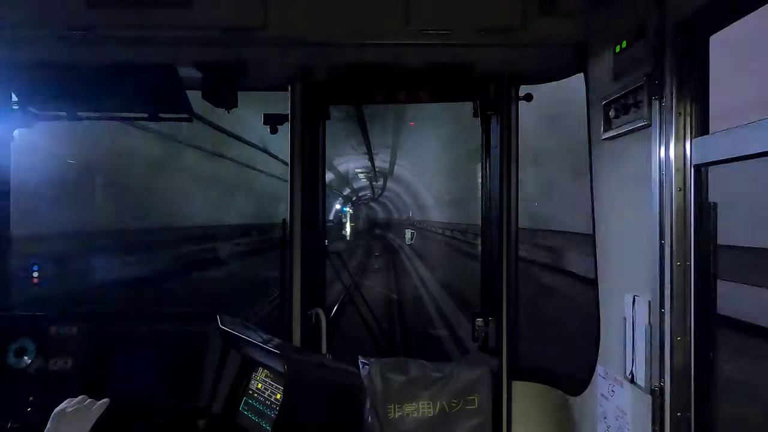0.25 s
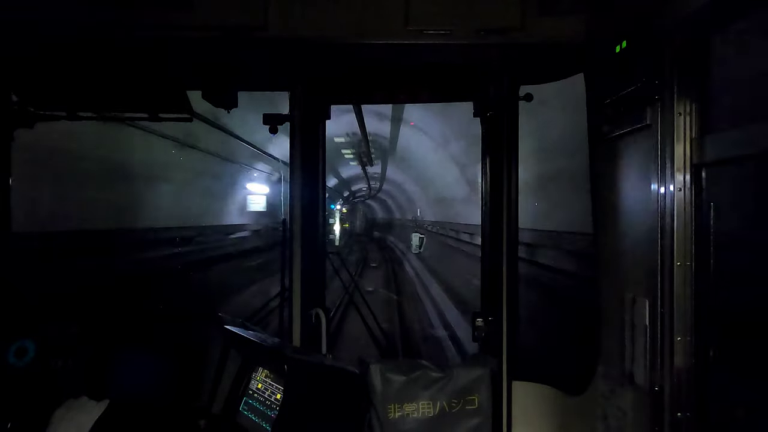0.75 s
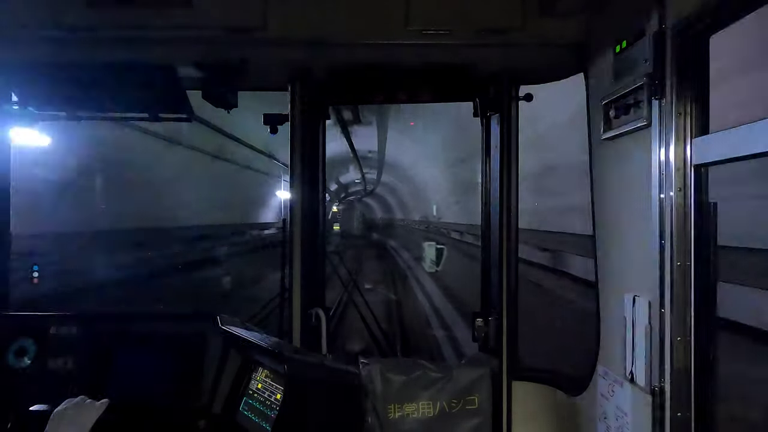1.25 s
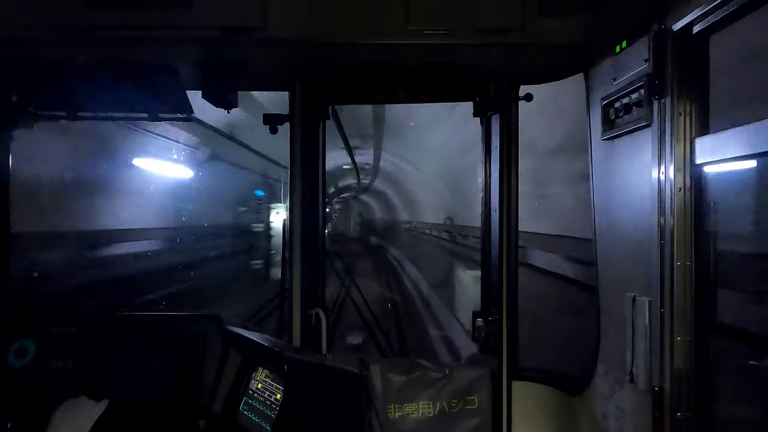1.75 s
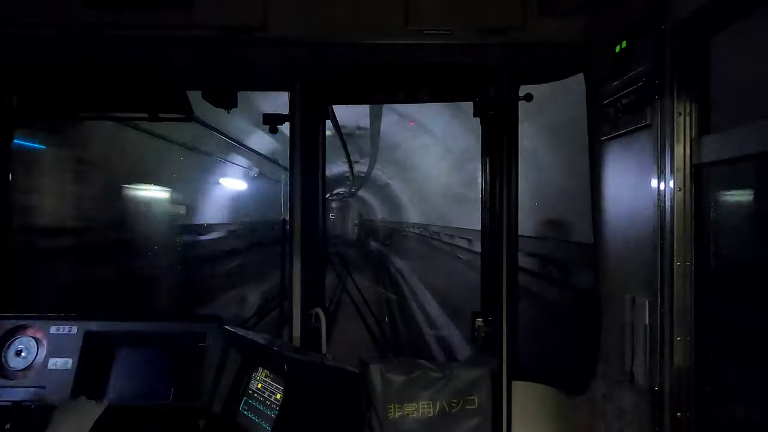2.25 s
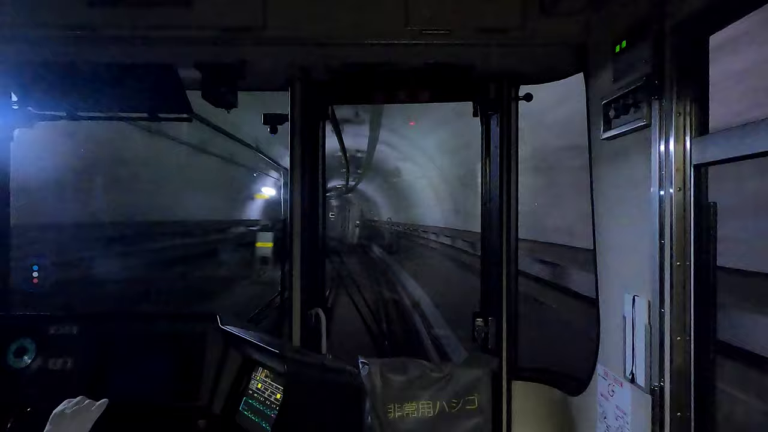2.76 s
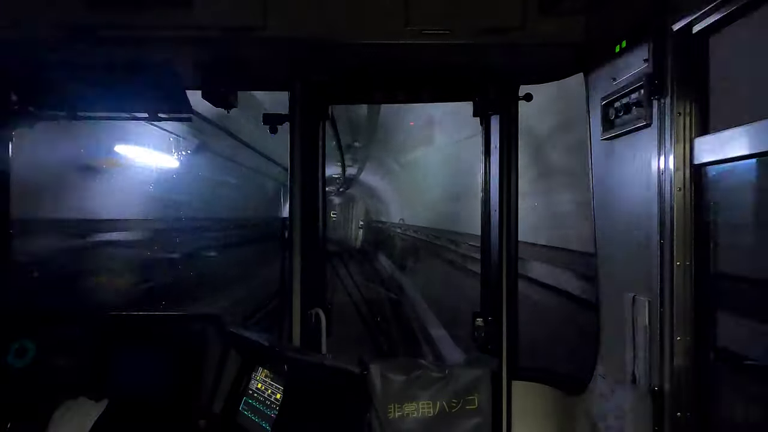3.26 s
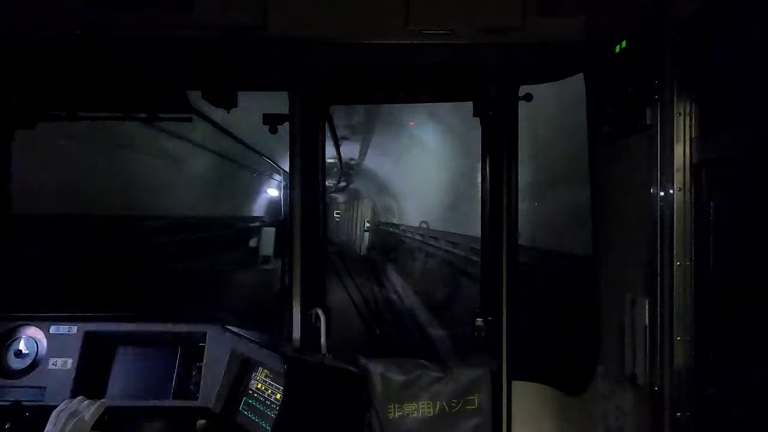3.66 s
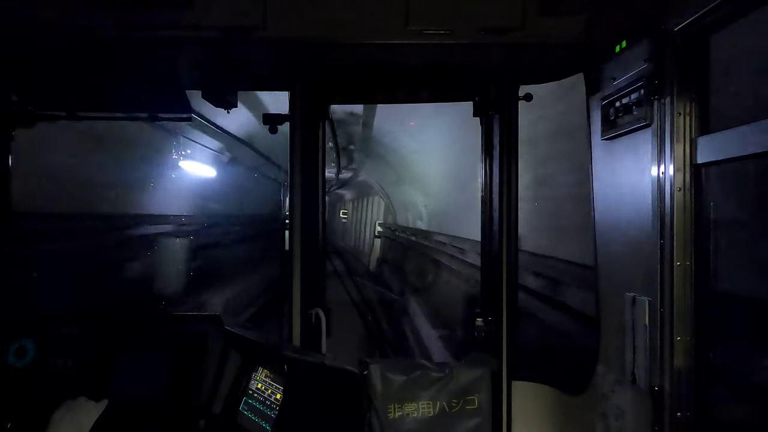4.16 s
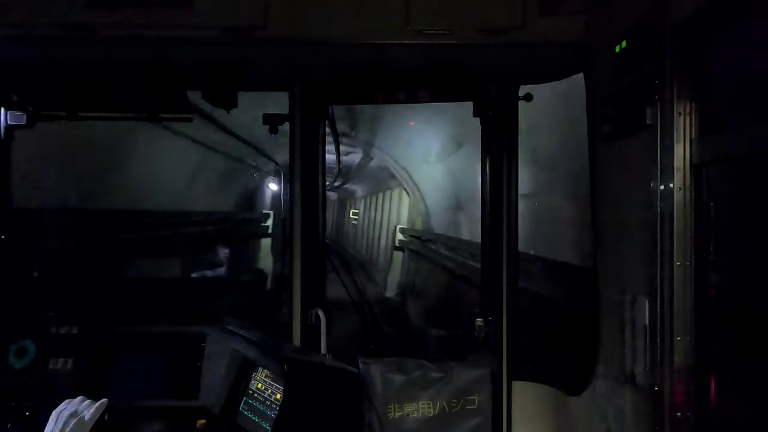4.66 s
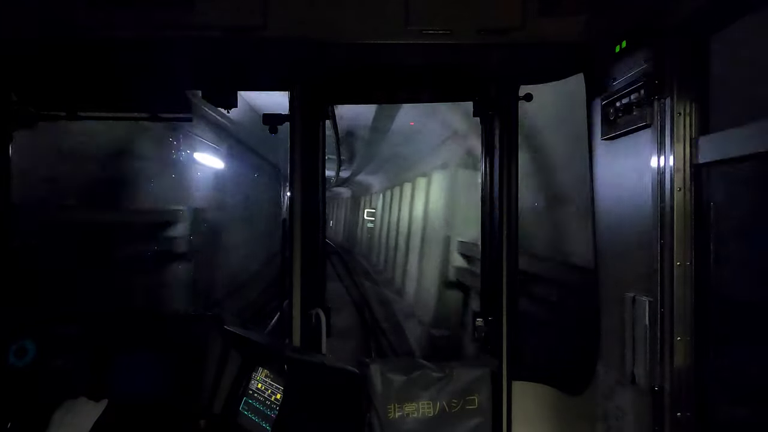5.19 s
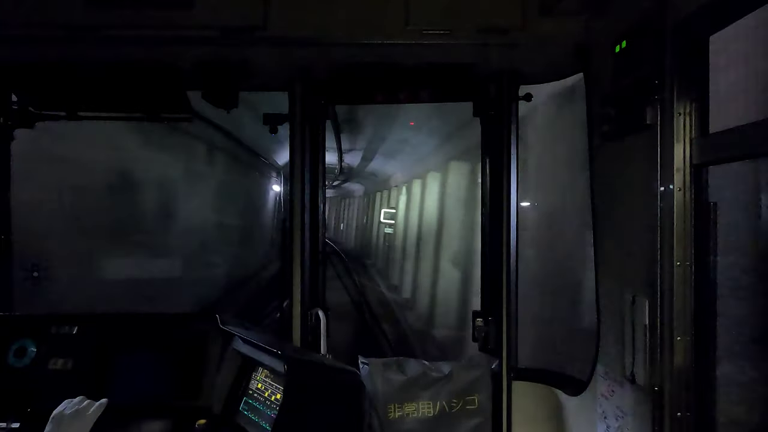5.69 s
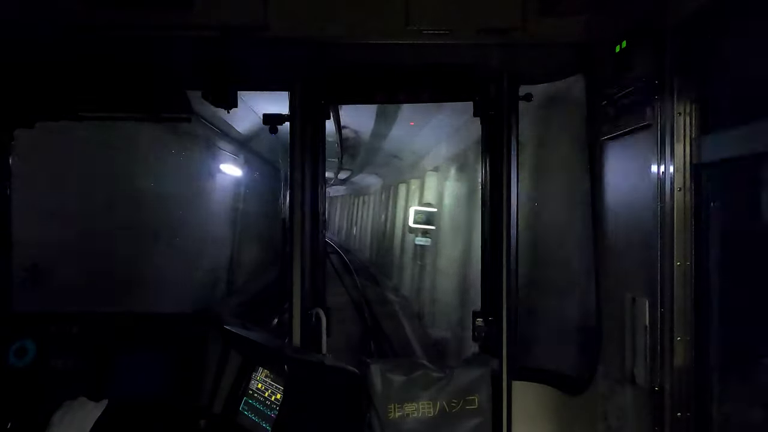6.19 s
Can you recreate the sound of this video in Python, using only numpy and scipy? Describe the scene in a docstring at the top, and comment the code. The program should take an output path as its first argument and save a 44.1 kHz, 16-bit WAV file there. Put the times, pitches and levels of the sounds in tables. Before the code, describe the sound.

Inside a driving cab, an electric train roars through a tunnel with deep wavering boom, wheel rumble and a droning rail hum that swells late.

```python
"""A low boom, rumble and roar fill the driving cab of an electric train running through a tunnel.
The boom is a wavering tone in narrow noise; rumble, roar and rushing air are shaped noise.
Worn rail drones as a hum with overtones, which swell late in the ride.
The cab lifts and cancels bands, and a close pair of microphones hears the result in stereo."""
import sys
import numpy as np
from scipy import signal
from scipy.fft import rfft, irfft, next_fast_len
from scipy.io import wavfile
from scipy.ndimage import uniform_filter1d

SR = 44100
rng = np.random.default_rng(int(sys.argv[2]) if len(sys.argv) > 2 else 0)


def unload_audio(sound):
    """Save the sound as a 16-bit wav file, at the path given as the first command line argument."""
    columns = np.transpose(np.atleast_2d(sound))
    # keep every value between -1 and 1, then stretch to whole-number steps
    steps = np.round(np.clip(columns, -1, 1) * 32767)
    wavfile.write(sys.argv[1], SR, steps.astype(np.int16))


N = 283563
MARGIN = 4096   # spare samples at each end, so filters are already running


def from_db(db):
    """Turn dB into a gain that multiplies the wave."""
    return 10 ** (np.asarray(db) / 20)


def rms_one(x):
    """Scale a sound to an rms (average strength) of 1."""
    return x / np.sqrt(np.mean(x ** 2) + 1e-20)


def in_time(rows):
    """Join the points of a time table by straight lines: one value per sample for each column."""
    s, *columns = np.transpose(rows)
    return [np.interp(np.arange(N) / SR, s, c) for c in columns]


def padded_size():
    """A length that is quick to transform and has room for both margins."""
    return next_fast_len(N + 2 * MARGIN)


def grid():
    """Frequencies of the transform bins in Hz, at least 1 so that a log is possible."""
    return np.maximum(np.fft.rfftfreq(padded_size(), 1 / SR), 1)


def at_hz(points):
    """Join the points of a frequency table, straight on a log frequency axis."""
    hz, *columns = np.transpose(points)
    return [np.interp(np.log(grid()), np.log(hz), c) for c in columns]


def drift(rate_hz):
    """Slow random wandering of rms 1: noise at every 40th sample, smoothed by two equal low-passes."""
    r = np.exp(-2 * np.pi * rate_hz * 40 / SR)
    raw = rng.standard_normal(N // 40 + 2002)
    slow = signal.lfilter([1], [1, -2 * r, r * r], raw)[2000:]   # drop the filter's start
    return np.interp(np.arange(N) / 40, np.arange(len(slow)), rms_one(slow))


def noise(gain):
    """Two unrelated noises of one colour: what both microphones share, and the diffuse rest."""
    size = padded_size()
    white = rng.standard_normal((2, size))
    return rms_one(irfft(rfft(white) * gain, size)[:, :N])


def coloured(spectrum):
    """Noise shaped by a spectrum table; only the shape counts, as its rms becomes 1."""
    return noise(from_db(at_hz(spectrum)[0]))


def band(hz, width_hz):
    """Narrow noise around a pitch that may move: two slow noises ride on a cosine and a sine."""
    phase = 2 * np.pi * np.cumsum(hz * np.ones(N)) / SR
    slow = 1 / (1 + (2 * grid() / width_hz) ** 3.0)
    return noise(slow) * np.cos(phase) + noise(slow) * np.sin(phase)


def hum(hz, width_hz, share, waver_hz):
    """A driven resonance: a wavering tone within narrow noise; share is the tone's part of the power."""
    phase = 2 * np.pi * np.cumsum(hz + waver_hz * drift(5.14)) / SR
    share = np.clip(share, 0, 1)
    tone = np.sqrt(2 * share) * np.sin(phase)
    return tone + np.sqrt(1 - share) * band(hz, width_hz)


def gusty(x, depth_db):
    """The level flutters a little, as turbulent air and uneven rail make it."""
    return x * from_db(depth_db * drift(13))   # flutter rate in Hz


def evened(x):
    """Flattens the noise's own slow swells, so that the level table sets the loudness."""
    span = max(int(0.12 * SR), 64)   # averages over 0.12 s, twice
    power = uniform_filter1d(uniform_filter1d(x ** 2, span, axis=1), span, axis=1)
    return rms_one(x / np.sqrt(power + 0.092))   # the added floor limits the lift of quiet spots


def swells(rows):
    """Bell-shaped level changes in dB at given times."""
    t = np.arange(N) / SR
    return sum(lift_db * np.exp(-((t - s) / width_s) ** 2) for s, lift_db, width_s in rows)


# the car body's boom swells and sags: (t/s, level/dB, f/Hz)
BODY_BOOM = [(0, -23, 39.9), (.45, -24.5, 39.95), (.85, -17.5, 39.7), (1.1, -28.5, 38.14),
             (1.48, -18, 36.03), (1.65, -22.5, 36.9), (1.9, -21, 38.32), (2.45, -21.5, 37.54),
             (2.94, -28.5, 35.26), (3.06, -19.5, 35.3), (3.42, -28.5, 38.3), (3.7, -17.5, 39.3),
             (4.3, -22.5, 40.73), (4.57, -31.5, 41.7), (4.75, -21, 41.43), (5.3, -25.5, 36.83),
             (5.6, -16, 33.86), (5.8, -21, 34), (6.43, -21.5, 36)]


def body_boom():
    """The car body resonates at a low, moving pitch; most of its power is a steady tone."""
    level_db, hz = in_time(BODY_BOOM)
    return from_db(level_db) * evened(hum(hz, width_hz=24, share=0.62, waver_hz=2.37))


# colour of the bogie rumble: (f/Hz, relative level/dB)
RUMBLE_COLOUR = [(8, -42), (25, 0.5), (50, 12.5), (90, 16), (130, 10.5), (170, 9.5), (260, -29.5),
                 (600, -94.5)]
# the bogie rumble thins on the worn rail: (t/s, level/dB)
RUMBLE_LEVEL = [(0, -23.5), (1.9, -22.5), (3.1, -24.5), (3.7, -24.5), (4.4, -23), (5.3, -28.5), (6.1, -25),
                (6.43, -25)]


def bogie_rumble():
    """The wheel frames rumble as low, evened noise."""
    level_db, = in_time(RUMBLE_LEVEL)
    return from_db(level_db) * evened(coloured(RUMBLE_COLOUR))


# colour of wheel and rail roar: (f/Hz, relative level/dB)
ROAR_COLOUR = [(60, -59), (150, -18.5), (270, -1), (330, -1), (500, -2.5), (700, -1), (1000, -6.5),
               (1200, -10.5), (1600, -17), (2400, -72.5), (5000, -100)]


def wheel_roar():
    """Wheel and rail roar through the floor as evened mid-range noise that fades very slightly."""
    start_db, slope_db_per_s = -19, -0.1
    level_db = start_db + slope_db_per_s * np.arange(N) / SR
    return from_db(level_db) * evened(coloured(ROAR_COLOUR))


# worn rail under the wheels: (t/s, drone level/dB, drone f/Hz, overtone level/dB, overtone f/Hz)
RAIL_DRONE = [(0, -25, 214.8, -27.5, 430.8), (1.0, -24, 215.4, -26.5, 432.1), (2.4, -25, 216, -33.5, 430.5),
              (2.8, -24.5, 220.2, -31, 434.3), (3.0, -27.5, 220, -32.5, 430.1),
              (3.3, -22, 222.8, -27.5, 430), (3.8, -25.5, 225, -32.5, 431.6), (4.3, -21.5, 226, -25, 428),
              (4.68, -20.5, 217, -26.5, 433), (4.85, -19, 219.4, -26.5, 436),
              (5.08, -23.5, 220.2, -22.5, 450), (5.25, -19, 222, -27, 445),
              (5.46, -14.5, 211.2, -30, 436.6), (5.6, -23, 205.8, -29.5, 430), (5.75, -17, 208.3, -24, 436),
              (5.88, -18.5, 231.1, -24, 436), (5.99, -20.5, 197.8, -27, 432.3),
              (6.1, -20.5, 213.1, -26, 432), (6.27, -22, 210.6, -22.5, 428.7),
              (6.43, -27.5, 212.1, -24.5, 427.6)]


def rail_drone():
    """Worn rail drives a drone and an overtone; the louder each is, the more of it is a firm hum."""
    drone_db, drone_hz, overtone_db, overtone_hz = in_time(RAIL_DRONE)
    smooth_rail_db, overtone_quiet_db = -23.5, -28   # at or below these, narrow noise only
    drone_firm = 0.07 * (drone_db - smooth_rail_db)   # share of tone, gained per dB
    overtone_firm = 0.1 * (overtone_db - overtone_quiet_db)
    drone = evened(hum(drone_hz, 76.6, drone_firm, waver_hz=5.1))
    overtone = evened(hum(overtone_hz, 58, overtone_firm, waver_hz=6.0))
    return from_db(drone_db) * drone + from_db(overtone_db) * overtone


# second body mode: (t/s, level/dB, f/Hz)
SECOND_MODE = [(0, -32.5, 60.5), (.5, -33.5, 65.2), (1.0, -26.5, 58.5), (1.3, -32.5, 60.4),
               (1.7, -26, 63.12), (2.5, -29, 63.67), (2.9, -25.5, 64.1), (3.2, -24.5, 76.5),
               (3.6, -29, 59.95), (4.5, -34.5, 62), (5.4, -31.5, 55.2), (6.43, -35, 55.1)]


def second_body_mode():
    """The car body also resonates a little higher, as narrow noise of moving pitch."""
    level_db, hz = in_time(SECOND_MODE)
    return from_db(level_db) * evened(band(hz, width_hz=24))


# ring of a floor panel: (t/s, level/dB)
PANEL_LEVEL = [(0, -30), (.8, -29), (1.4, -27.5), (2.1, -34), (2.7, -30), (3.3, -34.5), (4.2, -31.5),
               (5.0, -44), (5.6, -27.5), (6.43, -40)]


def floor_panel():
    """A floor panel rings as narrow noise at one fixed pitch."""
    level_db, = in_time(PANEL_LEVEL)
    return from_db(level_db) * evened(band(328.4, width_hz=39))


# colour of the air rush: (f/Hz, relative level/dB)
RUSH_COLOUR = [(400, -64), (1000, -23), (1500, -2.5), (2000, -3.5), (2500, -11), (3000, -19.5),
               (4500, -63.5), (10000, -110)]
# echo off the tunnel wall: (t/s, rush level/dB, bright edge level/dB)
WALL_ECHO = [(0, -36, -45.5), (.55, -35.5, -49), (.8, -34, -47), (1.1, -36.5, -49), (1.5, -35.5, -48.5),
             (2.2, -36, -49), (2.45, -35.5, -47), (3.06, -37.5, -45), (3.45, -35.5, -44.5), (4.7, -34, -45),
             (5.15, -34.5, -46.5), (5.6, -31.5, -43), (5.83, -33, -47.5), (5.95, -31, -42),
             (6.15, -30.5, -43), (6.43, -34.5, -48.5)]


def air_rush():
    """Air rushes between car and tunnel wall as fluttering noise."""
    rush_db, _ = in_time(WALL_ECHO)
    return gusty(from_db(rush_db) * coloured(RUSH_COLOUR), depth_db=0.8)


# puffs of air from things passing close: (t/s, lift/dB, half length/s); a negative lift is a dip
AIR_PUFFS = [(.33, 1, 0.067), (.72, 1.5, 0.055), (1.3, 0.5, 0.061), (1.5, 2, 0.072), (2.5, 1, 0.053),
             (4.91, 3, 0.12), (5.4, 2, 0.11), (5.78, 2.5, 0.044), (6.08, -0.5, 0.049)]
# colour of the rush's bright edge: (f/Hz, relative level/dB)
EDGE_COLOUR = [(1200, -46), (2200, -12), (2700, -1.5), (3300, -6.5), (4200, -13), (6000, -25.5),
               (10000, -80.5)]


def bright_edge():
    """The bright edge of the rush is fluttering noise that the puffs move more than the hiss."""
    _, edge_db = in_time(WALL_ECHO)
    level_db = edge_db + 1.6 * swells(AIR_PUFFS)
    return gusty(from_db(level_db) * coloured(EDGE_COLOUR), depth_db=1.05)


# colour of the air hiss: (f/Hz, relative level/dB)
HISS_COLOUR = [(1200, -46.5), (3000, -6), (4200, -4.5), (5500, -5), (7500, -5), (8200, -9.5), (9600, -12),
               (10500, -21.5), (12000, -48.5), (16000, -91.5)]
# colour of the highest air sound: (f/Hz, relative level/dB)
TOP_COLOUR = [(6000, -53.5), (9500, -12), (10500, -4), (11500, -5.5), (12700, -4), (13200, -4.5),
              (15000, -14), (15700, -26)]
# air along the car: (t/s, hiss level/dB, level/dB of the top above 10 kHz)
AIR_LEVEL = [(0.05, -56, -81), (1.69, -56.5, -83), (2.42, -53, -73), (2.9, -53.5, -74.5), (3.45, -51, -74),
             (3.9, -53, -76), (4.45, -53, -73), (4.94, -53, -75), (5.2, -55, -75.5), (6.2, -55.5, -83.5),
             (6.3, -58.5, -83)]


def air_hiss():
    """Air along the car hisses as two bands of noise that flutter and puff together."""
    hiss_db, top_db = in_time(AIR_LEVEL) + swells(AIR_PUFFS)
    hiss = from_db(hiss_db) * coloured(HISS_COLOUR)
    top = from_db(top_db) * coloured(TOP_COLOUR)
    return gusty(hiss + top, depth_db=0.8)


# the band above the rail ring: (t/s, level/dB)
UPPER_LEVEL = [(0, -44), (2, -43), (3.6, -44), (4.3, -44), (4.8, -33), (5.3, -39), (5.8, -35.5),
               (6.43, -46.5)]


def rail_ring():
    """The rail rings as broad-band noise that follows the rush, with a higher band that swells late."""
    rush_db, _ = in_time(WALL_ECHO)
    upper_db, = in_time(UPPER_LEVEL)
    ring_db = -29.5 + 0.9 * (rush_db - rush_db.mean())   # takes 0.9 of the rush's swing in dB
    ring = from_db(ring_db) * band(931.3, width_hz=346)
    upper = from_db(upper_db) * band(1215, width_hz=380)
    return gusty(ring + upper, depth_db=1.24)


# a second strand above the overtone sinks, jumps back up late and drops again: (t/s, level/dB, f/Hz)
UPPER_STRAND = [(0, -38.5, 499.7), (2.6, -38.5, 500), (3.3, -37.5, 493.5), (4.3, -32.5, 487.6),
                (4.7, -27.5, 478), (5.1, -29.5, 464.4), (5.4, -27, 465), (5.65, -30.5, 497.7),
                (6.0, -36, 470), (6.43, -35, 474)]


def overtone_strand():
    """A second strand above the overtone is narrow noise of moving pitch."""
    level_db, hz = in_time(UPPER_STRAND)
    return from_db(level_db) * evened(band(hz, width_hz=37))


# the fourth multiple of the drone swells late: (t/s, level/dB)
FOURTH_LEVEL = [(0, -45.5), (4.2, -45.5), (4.9, -28), (5.3, -41), (5.7, -33), (5.9, -26), (6.1, -26),
                (6.25, -37.5), (6.43, -27.5)]


def fourth_multiple():
    """Narrow noise sits at four times the drone's pitch, with that pitch smoothed over half a second."""
    level_db, = in_time(FOURTH_LEVEL)
    drone_hz = in_time(RAIL_DRONE)[1]
    hz = 4 * uniform_filter1d(drone_hz, SR // 2)
    return from_db(level_db) * evened(band(hz, width_hz=70))


# standing waves of the cab lift and cancel bands: (f/Hz, width/Hz, lift/dB)
CAB_WAVES = [(144, 20, 1.5), (280, 32, -3), (163, 16, -0.5), (188, 25, 3.5), (242, 29, 1.5), (259, 16, 3),
             (310, 96, 1), (320, 26, 0.5), (384, 30, 0), (498.8, 18, 4.5), (511, 20, 2), (555, 50, 1),
             (695, 55, -5), (959, 88, 3), (1165, 80, -2.5), (1264, 53, 2.5)]
# microphone pair: (f/Hz, likeness 0-1, left minus right level/dB, left lead/radians)
MICROPHONES = [(30, 0.99, -1.3, 0), (250, 0.99, -1.05, 0.054), (380, 1, -1.8, 0.075), (500, 0.95, -3, 0.26),
               (640, 0.88, -3.5, 0.051), (740, 0.68, -2.5, 0.17), (1280, 0.86, -3.5, 0),
               (1900, 0.88, -3, 0.84), (2300, 0.9, -4, 0.76), (2880, 0.5, -4.5, 1.0),
               (3300, .55, -3.5, 0.82), (3900, .4, -3, 0.91), (4540, 0.2, 0.5, 0.13),
               (7000, 0.08, -1.5, 0.13), (7700, 0, 2, 0), (11100, 0.07, 1.5, 0)]


def cab_and_pair(field):
    """Cab resonances, then the two microphones: alike in the bass, apart in the treble."""
    size = padded_size()
    cab_db = sum(lift_db * np.exp(-(2 * (grid() - hz) / width_hz) ** 2)
                 for hz, width_hz, lift_db in CAB_WAVES)
    # the sound goes on past both ends
    ends = [(0, 0), (MARGIN, size - N - MARGIN)]
    running = np.pad(field, ends, "reflect", reflect_type="odd")
    shared, diffuse = rfft(running) * from_db(cab_db)
    alike, lean_db, lead = at_hz(MICROPHONES)
    alike = np.clip(alike, 0, 1)
    mid = np.sqrt((1 + alike) / 2) * shared
    side = np.sqrt((1 - alike) / 2) * diffuse
    # each microphone takes half of the level and phase difference
    tilt = from_db(lean_db / 2) * np.exp(.5j * lead)
    left, right = (mid + side) * tilt, (mid - side) / tilt
    return irfft(np.array([left, right]), size)[:, MARGIN:MARGIN + N]


def scene():
    """All sources are summed, then heard in the cab by the microphone pair."""
    field = body_boom() + bogie_rumble() + wheel_roar()
    field += rail_drone() + second_body_mode() + floor_panel()
    field += air_rush() + bright_edge() + air_hiss()
    field += rail_ring() + overtone_strand() + fourth_multiple()
    return cab_and_pair(field)


def record(dry):
    """Gain control turns both channels down ahead of peaks and recovers; the top is cut, a fade opens."""
    limit_db, squeeze = -7, 0.4   # threshold; share of the excess dB taken away
    release_db_per_s = 78.5       # how fast the held excess falls, before the squeeze
    attack_s, look_s = 0.0036, 0.0044   # smoothing delay; how far the gain is moved earlier
    fade_in_s, cutoff_hz = 0.0015, 15500
    dry = np.pad(dry, [(0, 0), (MARGIN, MARGIN)], "reflect", reflect_type="odd")   # already running
    peak_db = 20 * np.log10(np.abs(dry).max(axis=0) + 1e-9)
    over_db = np.maximum(peak_db - limit_db, 0)
    # hold each peak, then let it fall in a straight line
    ramp_db = release_db_per_s * np.arange(dry.shape[1]) / SR
    held_db = np.maximum.accumulate(over_db + ramp_db) - ramp_db
    # two smoothing poles: no clicks in the gain
    r = np.exp(-2 / (attack_s * SR))
    smooth_db = signal.lfilter([(1 - r) ** 2], [1, -2 * r, r * r], held_db)
    early_db = np.roll(smooth_db, -int(look_s * SR))
    turned = dry * from_db(-squeeze * early_db)
    cut = signal.cheby2(20, 60, cutoff_hz, fs=SR, output="sos")   # 60 dB down from the cutoff up
    trimmed = signal.sosfilt(cut, turned)[:, MARGIN:MARGIN + N]
    fade = np.sin(np.pi / 2 * np.minimum(np.arange(N) / SR / fade_in_s, 1)) ** 2
    return trimmed * fade


dry = scene()
out = record(dry)
unload_audio(out)
```